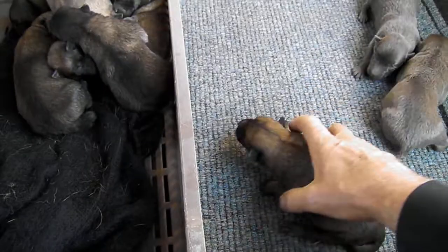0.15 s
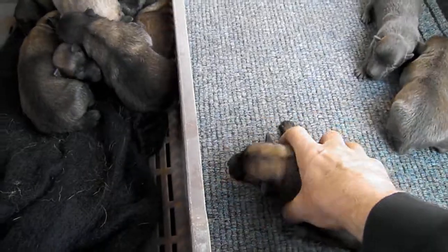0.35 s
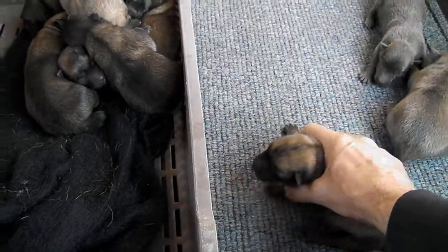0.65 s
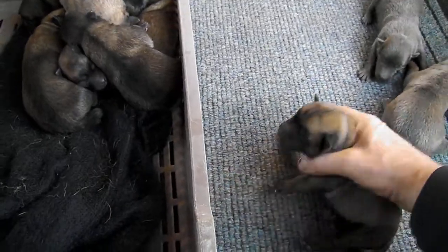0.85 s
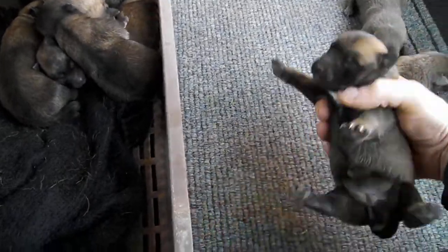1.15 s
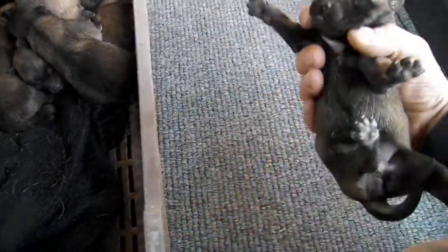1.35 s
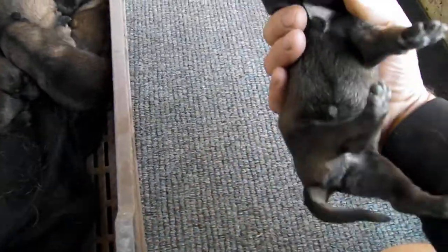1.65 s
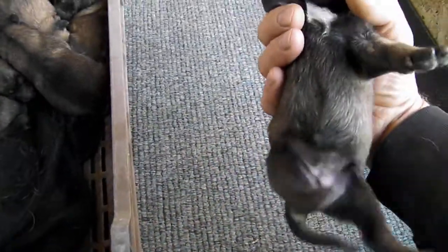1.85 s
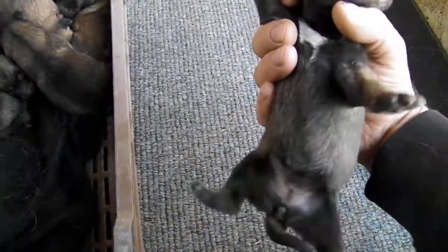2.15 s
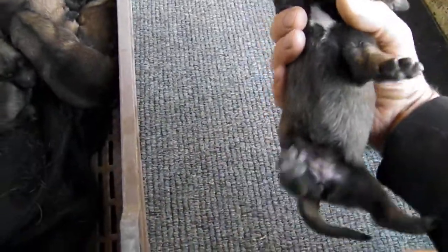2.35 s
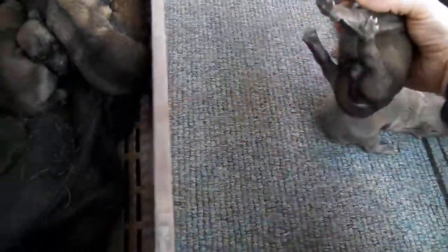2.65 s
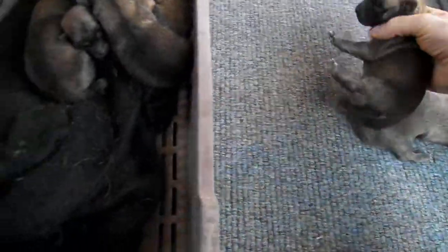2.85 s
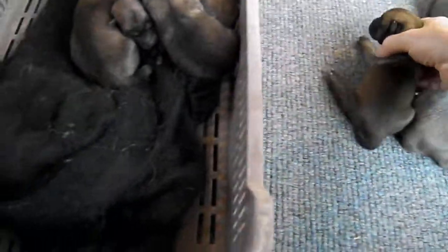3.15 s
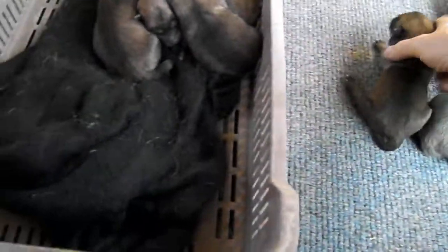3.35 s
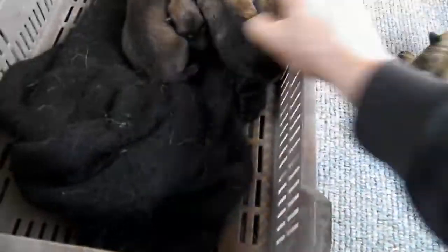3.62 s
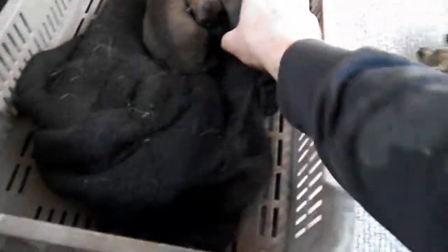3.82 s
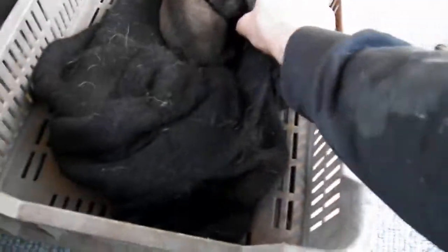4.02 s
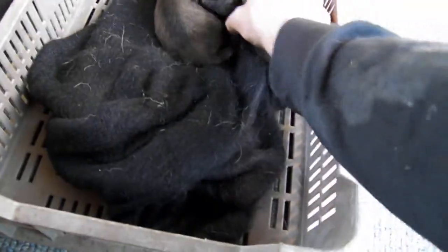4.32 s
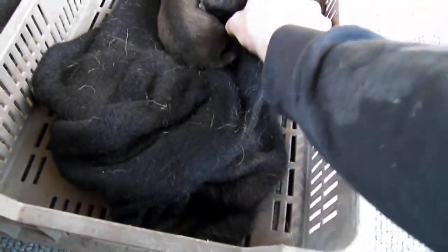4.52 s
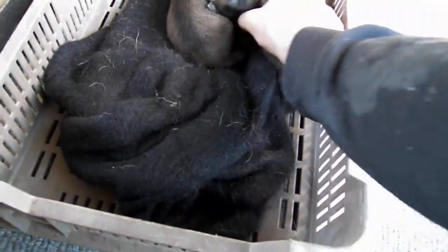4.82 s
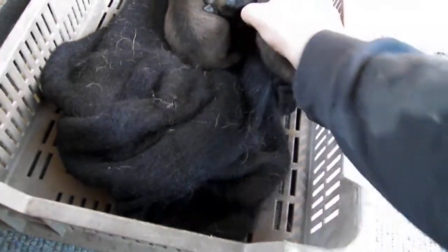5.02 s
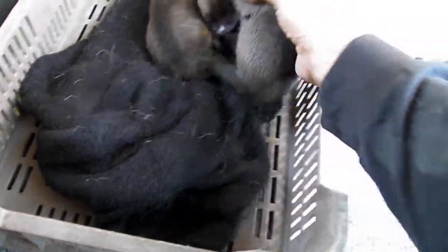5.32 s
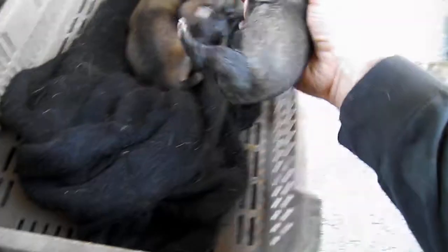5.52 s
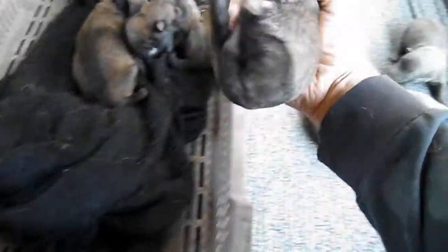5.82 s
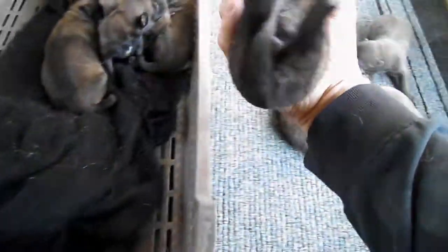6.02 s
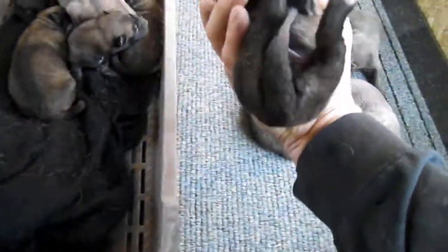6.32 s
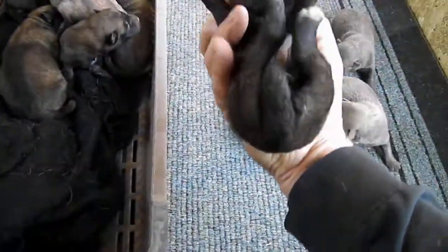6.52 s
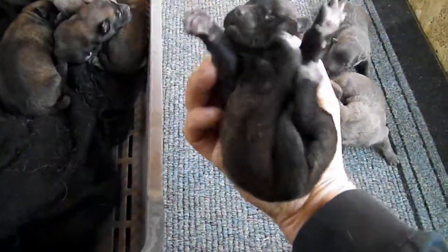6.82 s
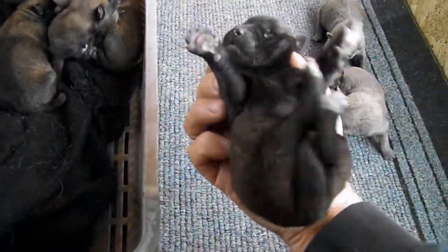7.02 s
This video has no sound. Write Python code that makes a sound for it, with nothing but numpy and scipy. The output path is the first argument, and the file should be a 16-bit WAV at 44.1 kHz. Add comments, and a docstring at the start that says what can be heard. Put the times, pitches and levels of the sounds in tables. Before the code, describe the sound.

Several newborn puppies cry in a carpeted room, heard close on a small recorder. Short nasal whines swoop upward, tremble and end in a rough catch, some overlapping. Thin whistles and rapid chirps fill the gaps, with sharp squeaks near the middle and strained, higher yelps later. Faint rustling and hiss run beneath, with barely audible brushes against a plastic crate.

```python
"""In a carpeted room, newborn puppies cry while a hand lifts them out of a plastic crate.
Each cry is a gliding, often trembling harmonic stack filtered by a tiny throat; some cries overlap.
The mouth opens with the pitch, and a rough catch ends each cry as the pitch sags.
Whistles and chirps, swept tones roughened by random pitch, ride on the cries and between them.
Shaped noise gives the rustling sleeve and the brushed crate; the room adds reflections."""
import sys
import numpy as np
from scipy import signal
from scipy.fft import rfft, irfft, next_fast_len
from scipy.io import wavfile
from scipy.ndimage import uniform_filter1d

SR = 44100
rng = np.random.default_rng(int(sys.argv[2]) if len(sys.argv) > 2 else 0)


def store_wav(level_fs):
    """Save 16-bit WAV to argv[1]."""
    pcm = np.round(np.clip(np.atleast_2d(level_fs), -1, 1) * 32767)
    wavfile.write(sys.argv[1], SR, pcm.T.astype(np.int16))


N = 316191
TIME = np.arange(N) / SR

# Colour of cloth, fur and room hiss: (frequency [Hz], relative density [dB])
RUSTLE_COLOUR = [(110, -24.5), (330, -5.5), (1500, -9.5), (3500, -7), (8000, -12.5), (15000, -20)]
# Brushes on the crate: (time [s], relative level [dB], decay time constant [s])
CRATE_BRUSHES = [(1.263, -46, 0.12), (2.975, -47, 0.018), (3.739, -40, 0.062), (6.213, -47, 0.027)]
# Colour of a brush: (frequency [Hz], relative density [dB])
BRUSH_COLOUR = [(150, -12.5), (350, -1), (8500, 3.5), (14000, -13)]
# Whistles: (start [s], end [s], pitch at start [Hz], in the middle [Hz], at the end [Hz], level [dB],
#   swell [dB], warble rate [1/s], warble depth [share of pitch], roughness [share of pitch])
WHISTLE_EVENTS = [ (0.422, 0.764, 4180, 4580, 5790, -45, -2, 37, 0.00065, 0.087),
                  (2.852, 3.184, 2493, 2390, 2427, -44.5, -3, 26.5, 0.061, 0.027),
                  (3.24, 3.728, 3474, 3640, 3700, -45, 5, 40.5, 0.012, 0.083),
                  (3.679, 3.728, 4630, 5000, 4700, -42, -5, -1, 0, .015),
                  (3.824, 3.883, 2390, 2763, 2240, -24, 9, -1, 0, .007),
                  (4.063, 4.117, 3290, 3250, 2440, -28, 10, 1, 0.051, 0.014),
                  (4.212, 4.249, 2890, 2740, 3000, -24, 7, 0, 0.0079, 0.0077),
                  (4.254, 4.293, 3200, 3540, 3200, -26, -2, 0, 0.02, .006),
                  (4.365, 4.47, 2900, 2625, 2890, -30.5, 3, 74, 0.081, .033),
                  (4.45, 4.739, 3250, 3510, 3590, -39, -13, 40, 0.0032, 0.082),
                  (5.097, 5.431, 2410, 2377, 2320, -38, -11, 40, 0.05, 0.021),
                  (5.453, 5.755, 3560, 3530, 3570, -41.5, 3, 41.5, 0.0023, 0.068),
                  (6.036, 6.285, 1997, 1852, 1680, -34.5, -8, 32, 0.17, 0.034),
                  (6.086, 6.13, 6460, 6950, 7060, -41, 0, -0.5, 0.056, 0.026),
                  (6.221, 6.355, 3360, 2990, 2820, -47.5, 4, 0, 0, 0.032),
                  (6.475, 6.826, 2300, 2525, 2456, -26.5, -5.5, 31.5, 0.11, 0.019),
                  (6.792, 6.985, 4690, 4620, 4600, -39, -8, 44, 0.058, 0.025),
                  (7.03, 7.165, 4500, 4380, 4400, -41.5, 2, 50, .024, 0.014), ]
# Runs of two-toned chirps: (first [s], until [s], gap [s], lower tone [Hz], its climb [Hz/s],
#   upper tone [Hz], level in mid-run [dB], growth [dB/s])
CHIRP_SERIES = [(0.836, 1.21, .085, 4190, 600, 7140, -43, 4),
                (1.873, 2.462, .134, 5260, 3430, 6620, -38.5, 10)]
# Cries: (loudness [dB], swell over the cry [dB], strain as treble [dB], growth of strain [dB],
#   mouth opening as tilt [dB], focus of the main throat resonance [dB], rasp [dB],
#   second mouth resonance [Hz], its height [dB], melody as (time [s], pitch [Hz]))
CRY_EVENTS = [ (-27, 3.5, 2, -27, -1.5, -4, -24.5, 760, 6.7, [(.215, 332.6), (.316, 426.4), (.41, 548.6),
              (.53, 519.5)]), (-24.5, -1.5, 10.5, 10, -1, -6.5, -34, 1180, 2.5, [(.772, 447), (.804, 591),
              (.87, 700), (.954, 909), (1.036, 908), (1.088, 937), (1.125, 847)]),
              (-25, 10.5, -5.5, -35, 2.5, -2.5, -35, 860, 2.9, [(1.315, 415), (1.382, 585.6), (1.426, 515),
              (1.495, 432), (1.548, 465)]), (-39, -9, -6, 13, 0, -8, -32, 1260, 3, [(1.66, 608),
              (1.745, 566)]), (-25, 9, -6.5, -8, 3.5, 1, -19.5, 2180, 8.2, [(1.755, 417), (1.846, 523.4),
              (1.91, 689), (1.954, 752.5), (1.994, 656), (2.045, 710)]),
              (-20.5, 7.5, 0.5, -2, 4, 0, -27, 660, 7.6, [(2.04, 354.4), (2.145, 337), (2.24, 397),
              (2.318, 472.5), (2.36, 690.7), (2.44, 746.5), (2.482, 630), (2.55, 483)]),
              (-20, 0.5, -5, -16, 2, 10.5, -39, 2680, 6.5, [(2.36, 420), (2.422, 459), (2.535, 403),
              (2.64, 493.6), (2.725, 442), (2.764, 497), (2.796, 483), (2.855, 527)]),
              (-21.5, -2, -2, -4, -2, 2.5, -27.5, 2210, 7.3, [(3.15, 296.7), (3.18, 324.2), (3.26, 434),
              (3.32, 459), (3.375, 437.7), (3.41, 382), (3.46, 411.5), (3.5, 452), (3.6, 468)]),
              (-21, 6, -2, 6, -1, 7.5, -25.5, 1380, 6.7, [(3.885, 350), (3.96, 382.5), (4.02, 450.6),
              (4.075, 506.4), (4.11, 470), (4.175, 435.7), (4.24, 562), (4.33, 570.3), (4.462, 615.7)]),
              (-23, 0, 5, 10, 2.5, -0.1, -29.5, 2020, 10.2, [(4.72, 434.5), (4.756, 457.6), (4.876, 891),
              (4.955, 674), (4.998, 754), (5.03, 716.4), (5.142, 865), (5.186, 798), (5.275, 741)]),
              (-22, 1, 2.5, 6, 2.5, 4.7, -29, 2100, 6.2, [(5.512, 439.4), (5.568, 944), (5.625, 1184),
              (5.682, 925), (5.73, 867), (5.778, 634), (5.85, 694.5), (5.887, 658), (5.955, 820),
              (6.087, 883)]), (-22, -1, 3.5, 6, 2.5, 4, -29.5, 910, 6, [(6.355, 424.6), (6.39, 475.6),
              (6.417, 451.4), (6.465, 513), (6.51, 491), (6.56, 527.4), (6.632, 543.6), (6.695, 540)]),
              (-22, 5, 1, 14, 0.5, 6.5, -21, 1200, 2.3, [(6.96, 364.6), (6.984, 386), (7.05, 355),
              (7.086, 391.7), (7.21, 485)]), ]
# Bouts of trembling: (first dip [s], length [s], rate at first dip [1/s], change of rate [1/s^2], depth [Hz])
TREMBLE_BOUTS = [(2.054, 0.65, 21.4, -1, 36.2), (3.18, 0.41, 19.5, -14.5, 42.8),
                 (3.919, .41, 15.5, 0.5, 33)]
# Throat response: (frequency [Hz], level of a harmonic there [dB])
THROAT_RESPONSE = [(300, -19.5), (420, -5.5), (580, -12), (720, -4), (900, 1.5), (1200, 0.5), (1500, -2.5),
                   (1850, -13.5), (2350, -12.5), (3200, -25.5), (5000, -41), (8300, -25.5), (11000, -41),
                   (13500, -40)]
# Weight of mouth opening: (frequency [Hz], share of the tilt)
OPENING_SHARE = [(400, -0.71), (1000, 0.63), (2300, 0.98), (5000, -0.48)]
# Weight of vocal strain: (frequency [Hz], share of the strain)
STRAIN_SHARE = [(2500, 0.069), (5000, 0.85)]
# Weight of the throat's focus: (frequency [Hz], share of the focus)
FOCUS_SHARE = [(600, -0.038), (950, 0.15), (1300, 0.15), (1650, -0.67), (5000, 0.59)]
# Colours of air at the folds: (frequency [Hz], relative density [dB])
RASP_COLOUR = [(150, -56), (500, -5.0), (3600, -1.0), (5200, -28)]
HISS_COLOUR = [(1500, -29), (3500, -17), (6000, -10), (8600, 11.0), (10800, -4), (13500, 4), (15500, -9)]

CUTOFF_HZ, LOW_CUT_HZ = 15700, 86
# A cry starts this far down and rises; it dies away at its end
ATTACK_DB, ATTACK_S, ATTACK_PITCH_HZ = 13.5, 0.037, 437  # time constant at this starting pitch
RELEASE_DB, RELEASE_S = 11.5, 0.025
END_SAG, SAG_S = 0.219, .014  # share of pitch lost as the air runs out
MID_PITCH_HZ, OPENING_DB_PER_OCTAVE = 527, 9.5  # the mouth opens as the pitch rises
CLOSING_DB, CLOSING_S = 22.5, .016  # and shuts as the cry ends
EVENNESS = 0.73  # how far loudness holds while harmonics slide through resonances
TREMBLE_FADE_S = 0.0163
# Just before the end the folds break into a short rough bark
CATCH_DB, CATCH_BEFORE_END_S, CATCH_S, CATCH_SLACK = 3, 0.02, 0.011, 1.8
# A whistle rings out where it crosses this resonance
WHISTLE_PEAK_HZ, WHISTLE_PEAK_WIDTH_HZ, WHISTLE_PEAK_DB = 2662, 158, 6.5
WARBLE_ONSET_S = 0.057  # time constant of the growing warble
SCOOP, SCOOP_S = 0.0599, .025  # a warbling whistle slides up from this share below its pitch
CHIRP_ROUGHNESS = .034  # share of pitch


def from_db(db):
    """Logarithmic level: 20 dB is a factor of ten in amplitude."""
    return 10 ** (np.asarray(db) / 20)


def rms_one(x):
    """Normalisation: the root mean square becomes one."""
    return x / np.sqrt(np.mean(x ** 2) + 1e-20)


def at_hz(points, hz):
    """Spectral interpolation: values vary linearly with log frequency."""
    f, value = np.transpose(points)
    return np.interp(np.log(np.maximum(hz, 1)), np.log(f), value)


def noise(spectrum, size):
    """Spectral shaping: white noise weighted by frequency becomes coloured noise of rms one."""
    padded = next_fast_len(size)
    hz = np.fft.rfftfreq(padded, 1 / SR)
    coloured = rfft(rng.standard_normal(padded)) * from_db(at_hz(spectrum, hz))
    return rms_one(irfft(coloured, padded)[:size])


def drift(rate, size):
    """Low-pass filtering: white noise becomes a random wander, mostly slower than rate [Hz]."""
    padded = next_fast_len(size + SR // 16)
    hz = np.fft.rfftfreq(padded, 1 / SR)
    slowed = rfft(rng.standard_normal(padded)) / (1 + (hz / rate) ** 2)
    return rms_one(irfft(slowed, padded))[:size]


def rustle(level_db=-45.0, grain_db=1.13):
    """Broadband friction: cloth, fur and room hiss as coloured noise with an unsteady level."""
    return from_db(level_db + grain_db * drift(74, N)) * noise(RUSTLE_COLOUR, N)


def room(x, near_db=-12, far_db=-23, echo_db=-23, echo_s=.056):
    """Reverberation: quick floor and crate reflections, one later echo and a faint short tail."""
    age = TIME[:SR // 2]
    near_t60, far_t60 = .1, .45  # time to decay by 60 dB [s]
    response = from_db(echo_db) * signal.unit_impulse(len(age), int(echo_s * SR))
    for db, t60 in ((near_db, near_t60), (far_db, far_t60)):
        echoes = rng.standard_normal(len(age)) * from_db(-60 * age / t60) * (age > .002)
        response = response + from_db(db) * echoes / np.sqrt(np.sum(echoes ** 2))
    return x + signal.fftconvolve(x, response)[:N]


def brushes(grain_db=2.0):
    """Scraping friction: grainy noise rises quickly and decays exponentially."""
    envelope = np.zeros(N)
    for s, db, length in CRATE_BRUSHES:
        age = np.maximum(TIME - s, 0)
        rise = 1 - np.exp(-age / (0.17 * length))
        envelope += from_db(db) * rise * np.exp(-age / length) * 3.75
    return envelope * noise(BRUSH_COLOUR, N) * from_db(grain_db * drift(150, N))


def whistle(start, end, first_hz, middle_hz, last_hz, db, swell_db, rate, depth, rough,
            unsteady=0.1, dip=4.8, overtone_db=-36, edge_s=0.0045):
    """Frequency modulation: a tone on one bow of pitch warbles in arches; roughness smears it to a hiss."""
    at = np.flatnonzero((TIME >= start) & (TIME <= end))
    n = len(at)
    age = TIME[at] - start
    place = np.linspace(-1, 1, n)
    fade = np.clip(np.minimum(age, end - TIME[at]) / edge_s, 0, 1)
    bow = np.polyfit([-1, 0, 1], [first_hz, middle_hz, last_hz], 2)
    pitch = np.polyval(bow, place)
    ring_db = WHISTLE_PEAK_DB * np.exp(-((pitch - WHISTLE_PEAK_HZ) / WHISTLE_PEAK_WIDTH_HZ) ** 2)
    level_db = db + swell_db * place / 2 + ring_db

    warble_cycles = np.cumsum(rate * (1 + unsteady * drift(24.0, n))) / SR
    arch = np.abs(np.sin(np.pi * warble_cycles)) - 2 / np.pi  # 2 / pi is the mean of an arch
    arch = arch * (1 - np.exp(-age / WARBLE_ONSET_S))
    scoop = SCOOP * (rate > 0) * np.exp(-age / SCOOP_S)
    pitch = pitch * (1 - scoop + depth * arch + rough * drift(500, n))

    phase = 2 * np.pi * np.cumsum(pitch) / SR
    overtone = from_db(overtone_db) * np.sin(2 * phase) * (2 * pitch < CUTOFF_HZ)
    tone = np.sin(phase) + overtone
    # a warble is loudest at the top of each arch
    swell = rms_one(np.exp(dip * np.sqrt(abs(depth)) * arch + 6 * rough * drift(430, n)))
    out = np.zeros(N)
    out[at] = np.sqrt(2) * tone * swell * fade * from_db(level_db)
    return out


def chirps(first, until, gap, lower_hz, climb, upper_hz, db, growth_db,
           rise_s=.026, fall_s=0.0131, onset=0.75, ending=0.86, swell_db=6, upper_db=1):
    """Frequency sweeps: evenly spaced pairs of short tones sweep steeply up and tip over."""
    out = np.zeros(N)
    for s in np.arange(first, until, gap):
        past_middle = s - (first + until) / 2
        level_db = db + growth_db * past_middle
        tones = ((lower_hz + climb * past_middle, level_db), (upper_hz, level_db + upper_db))
        for hz, tone_db in tones:
            out += whistle(s - rise_s, s + fall_s, hz * onset, hz, hz * ending,
                           tone_db, swell_db, 0, 0, CHIRP_ROUGHNESS)
    return out


def tremble(t):
    """Vibrato: a sinusoidal pitch swing [Hz] from the bouts that begin within these times."""
    swing = np.zeros(len(t))
    for s, length, rate, change, depth_hz in TREMBLE_BOUTS:
        if t[0] <= s <= t[-1]:
            age = t - s
            within = np.clip(1 + np.minimum(age, length - age) / TREMBLE_FADE_S, 0, 1)
            cycles = rate * age + change * age ** 2 / 2
            swing -= depth_hz * within * np.cos(2 * np.pi * cycles)
    return swing


def gesture(rows, glide_s):
    """Pitch glide: a moving average rounds the melody; also gives samples, age and time left."""
    s, hz = np.transpose(sorted(rows))
    at = np.flatnonzero((TIME >= s[0]) & (TIME <= s[-1]))
    melody = np.interp(TIME[at], s, hz)
    pitch = uniform_filter1d(melody, max(1, int(glide_s * SR)), mode="nearest")
    return at, TIME[at] - s[0], s[-1] - TIME[at], pitch


def cry(loudness_db, swell_db, effort_db, growth_db, mouth_db, focus_db, rasp_db, second_hz, second_db, melody,
        waver=0.00278, shimmer_db=1.73, flutter_db=3.5, hiss_db=-24, tremble_rate=2.05, grain_db=0.83,
        rise_s=0.011, fall_s=0.0035, second_octaves=0.19):
    """Source and filter: the folds' harmonics pass the throat; air rasps past them once a cycle."""
    at, age, left, pitch = gesture(melody, glide_s=0.012)
    n = len(at)
    progress = np.linspace(-.5, .5, n)
    fade = np.clip(np.minimum(age / rise_s, left / fall_s), 0, 1)
    attack_s = ATTACK_S * (ATTACK_PITCH_HZ / pitch[0]) ** 2  # low starts come up more slowly
    catch = np.exp(-((left - CATCH_BEFORE_END_S) / CATCH_S) ** 2)
    level_db = loudness_db + swell_db * progress + CATCH_DB * catch
    level_db = level_db - ATTACK_DB * np.exp(-age / attack_s) - RELEASE_DB * np.exp(-left / RELEASE_S)
    opening_db = mouth_db + OPENING_DB_PER_OCTAVE * np.log2(pitch / MID_PITCH_HZ)
    opening_db = opening_db - CLOSING_DB * np.exp(-left / CLOSING_S)
    pitch = (pitch + tremble(TIME[at])) * (1 - END_SAG * np.exp(-left / SAG_S))
    # the treble swells less than the body of the cry, and more as the mouth opens
    strain_db = effort_db + growth_db * progress - 1.12 * (level_db + 25.0) + 1.6 * opening_db

    # tight folds (high pitch) keep their top harmonics clean, loose ones turn them to hiss
    clean = 1 / (1 + (540 / pitch) ** 6)
    # the folds are unsteady while they start and stop, and while a low pitch moves
    edges = np.exp(-np.minimum(age, left) / 0.01)
    motion = np.sqrt(np.abs(np.gradient(np.log(pitch))) * SR / tremble_rate)
    slack = 1 + 4 * edges + CATCH_SLACK * catch + (1 - clean) * motion
    jitter = .0045 * slack * drift(220, n)
    pitch = pitch * (1 + waver * drift(62, n) + jitter)
    phase = 2 * np.pi * np.cumsum(pitch) / SR

    voice, power = np.zeros(n), np.zeros(n)
    for k in range(1, int(CUTOFF_HZ / pitch.min())):
        hz = k * pitch
        treble = np.clip(at_hz(STRAIN_SHARE, hz), 0, 1)
        db = at_hz(THROAT_RESPONSE, hz) + opening_db * at_hz(OPENING_SHARE, hz) + strain_db * treble
        db = db + focus_db * at_hz(FOCUS_SHARE, hz)
        db = db + flutter_db * (0.69 + treble) * drift(14.2, n)
        db = db + second_db * np.exp(-(np.log2(hz / second_hz) / second_octaves) ** 2)
        # slack folds make each harmonic grainy
        db = db + grain_db * np.minimum(slack - .5, 2) * drift(62, n)
        top_fade = np.clip((14800 - hz) / 800, 0, 1)
        height = from_db(db) * np.sqrt(1 - treble * (1 - clean)) * top_fade
        voice += np.sqrt(2) * height * np.sin(k * phase + rng.uniform(0, 2 * np.pi))
        power += height ** 2
    voice = voice / power ** (EVENNESS / 2)

    puffs = 1 + 0.71 * np.cos(phase)
    rasp = from_db(rasp_db) * slack * noise(RASP_COLOUR, n)
    hiss = noise(HISS_COLOUR, n) * from_db(hiss_db + strain_db) * np.sqrt(1 - clean)
    out = np.zeros(N)
    out[at] = (voice + puffs * (rasp + hiss)) * fade * from_db(level_db + shimmer_db * drift(36, n))
    return out


def scene():
    """Superposition: cries, whistles, chirps and brushes excite the room; the rustle is added."""
    cries = sum(cry(*c) for c in CRY_EVENTS)
    whistles = sum(whistle(*w) for w in WHISTLE_EVENTS)
    chirping = sum(chirps(*c) for c in CHIRP_SERIES)
    return (room(cries + whistles + chirping + brushes()) + rustle())[None]


def record(dry):
    """Band limiting: a small recorder loses deep bass, a narrow treble notch and the top."""
    high_pass = signal.butter(1, LOW_CUT_HZ, "high", fs=SR, output="sos")
    thin = signal.sosfilt(high_pass, dry)
    notched = signal.lfilter(*signal.iirnotch(7880, 35, fs=SR), thin)
    low_pass = signal.ellip(12, .2, 90, CUTOFF_HZ, fs=SR, output="sos")
    return signal.sosfilt(low_pass, notched)


dry = scene()
out = record(dry)
store_wav(out)
```